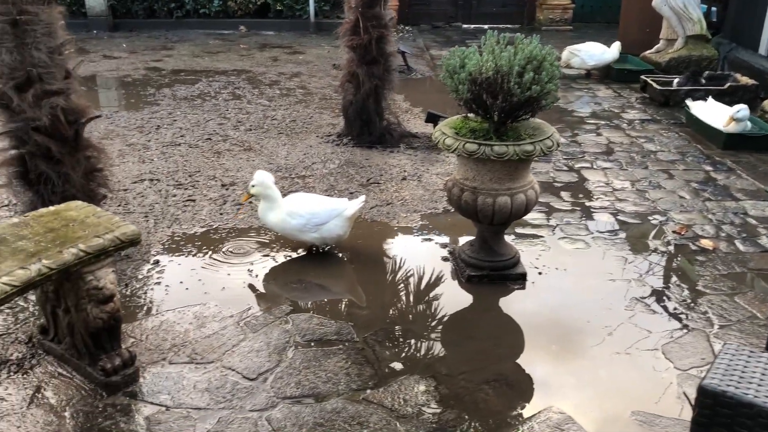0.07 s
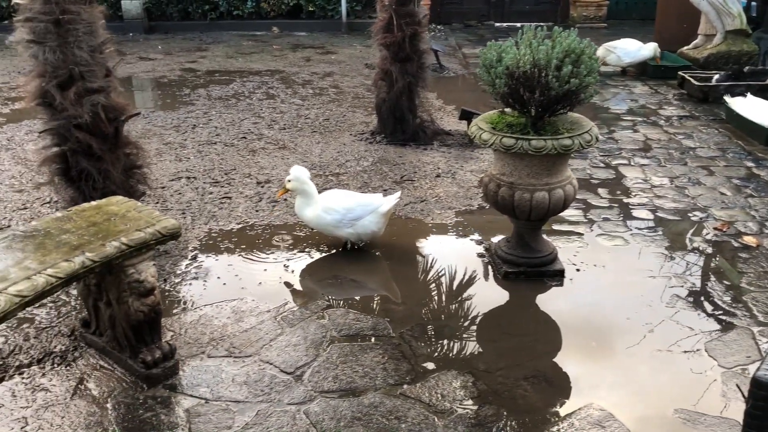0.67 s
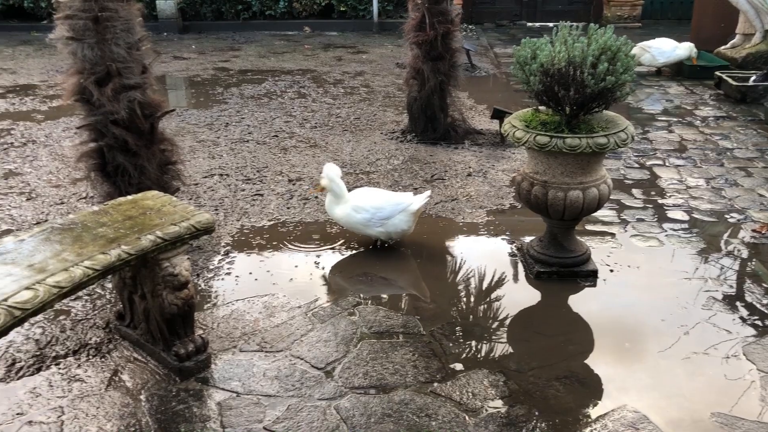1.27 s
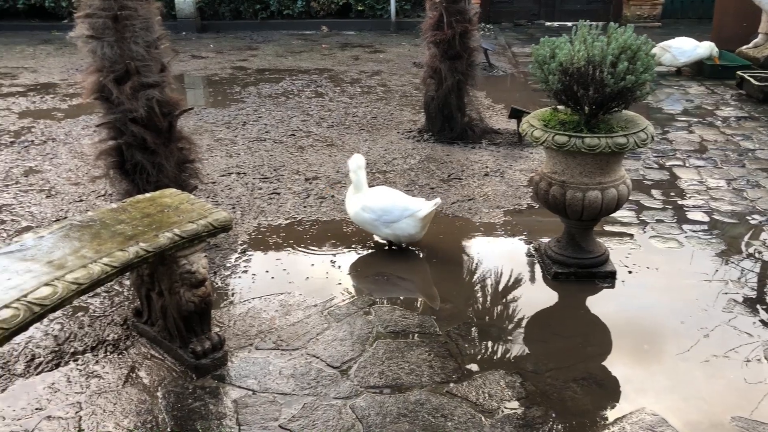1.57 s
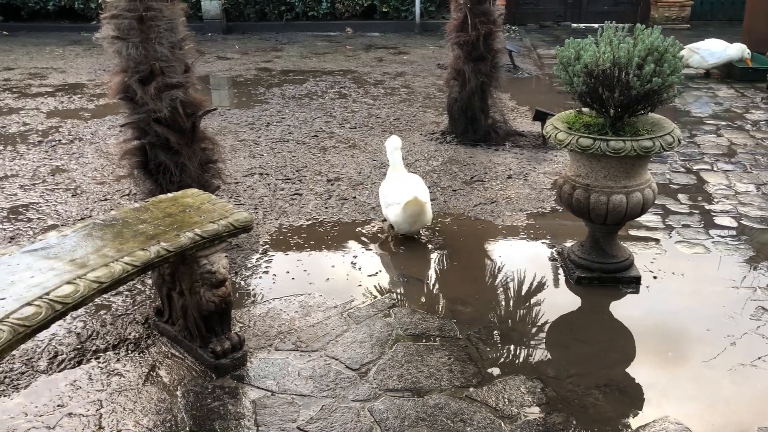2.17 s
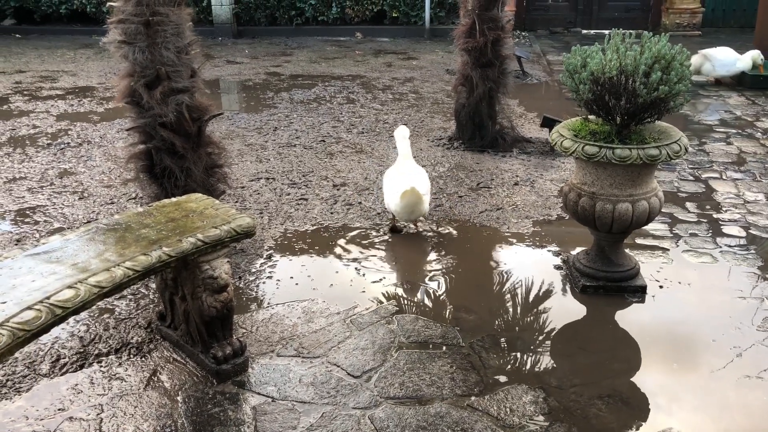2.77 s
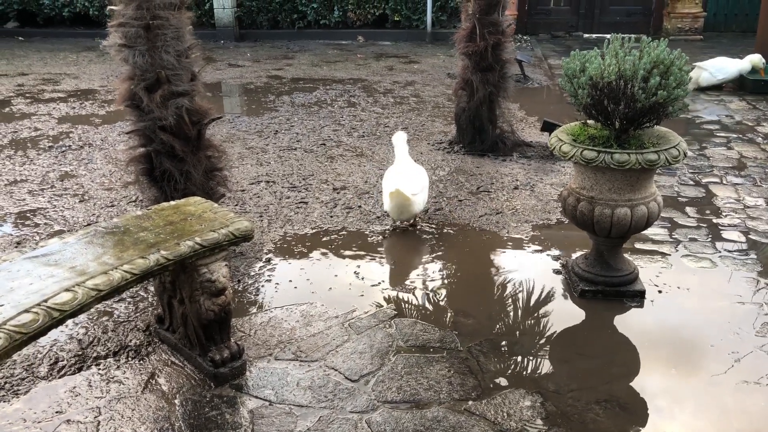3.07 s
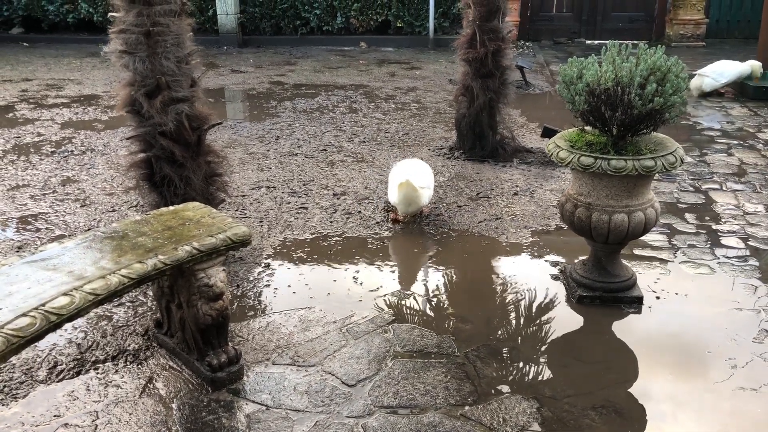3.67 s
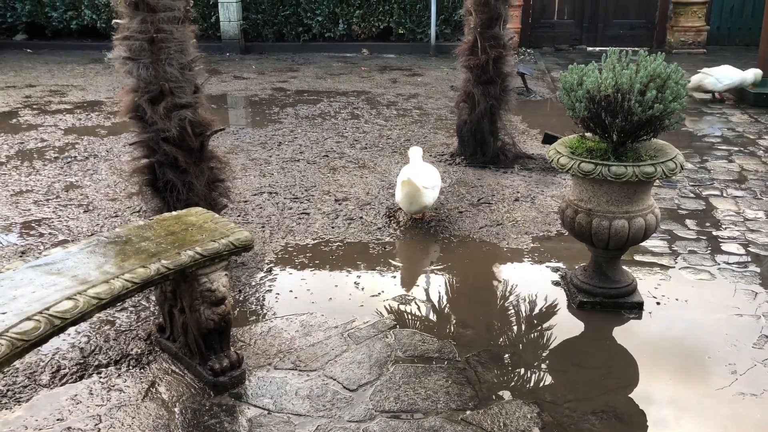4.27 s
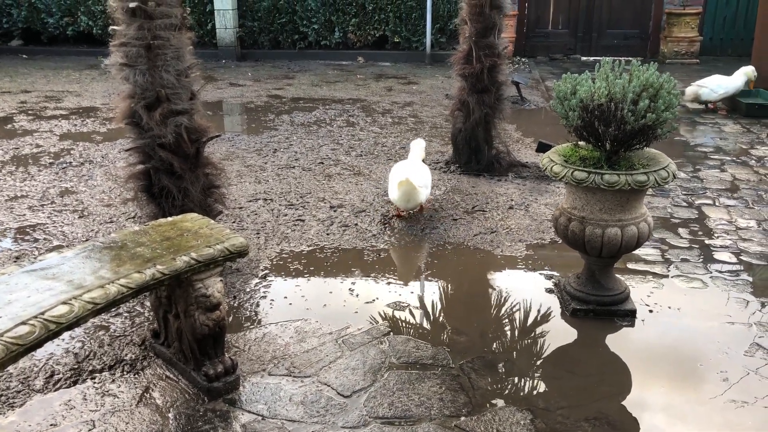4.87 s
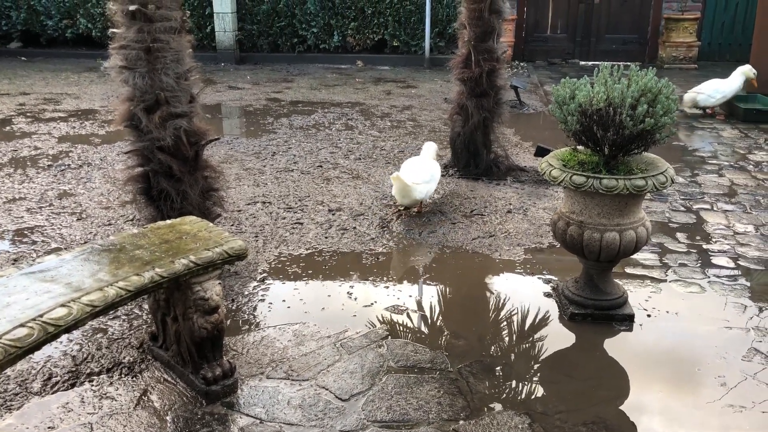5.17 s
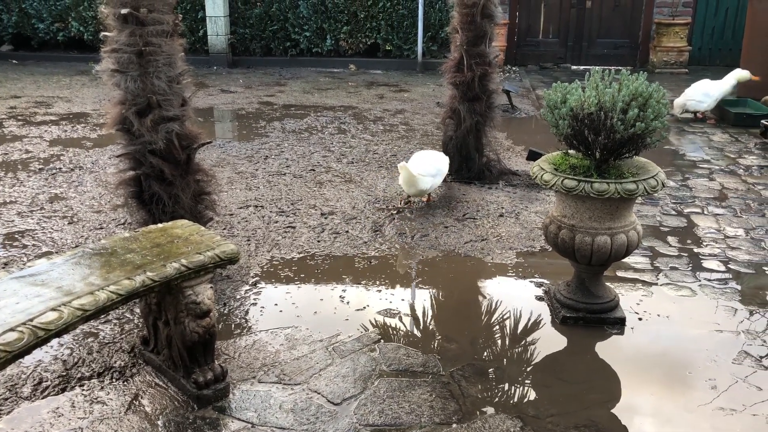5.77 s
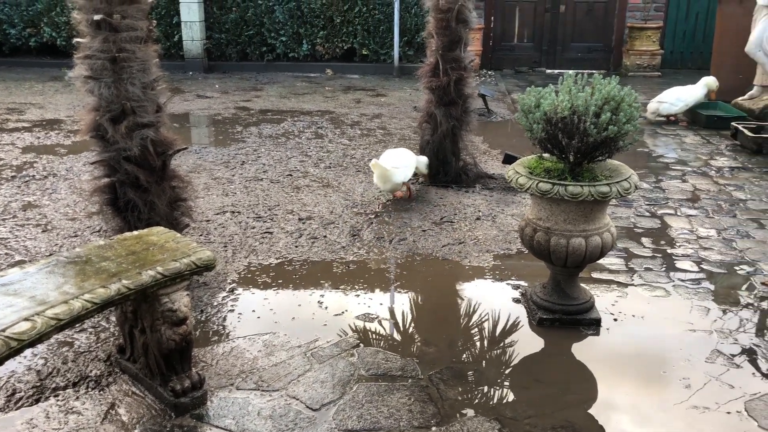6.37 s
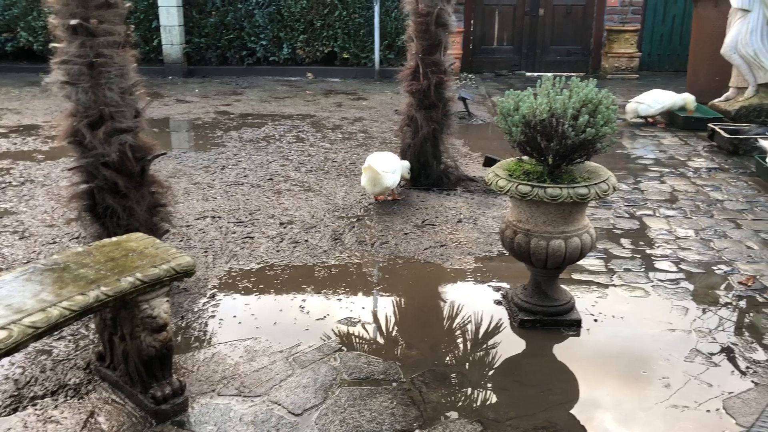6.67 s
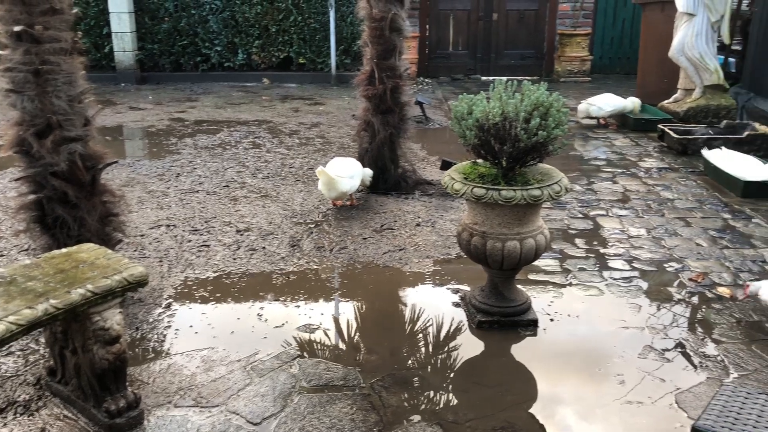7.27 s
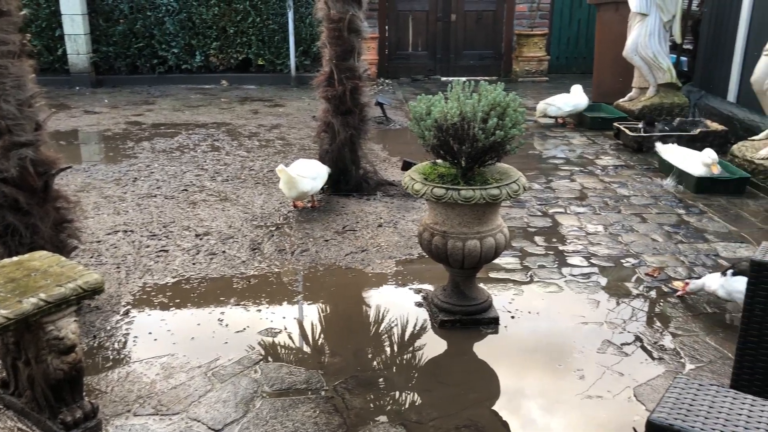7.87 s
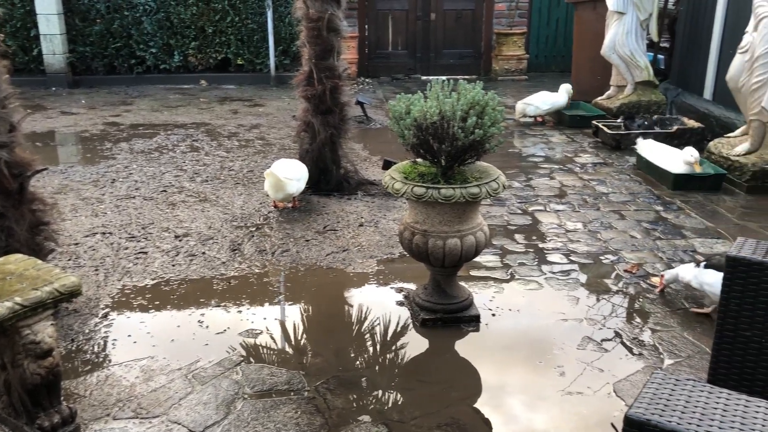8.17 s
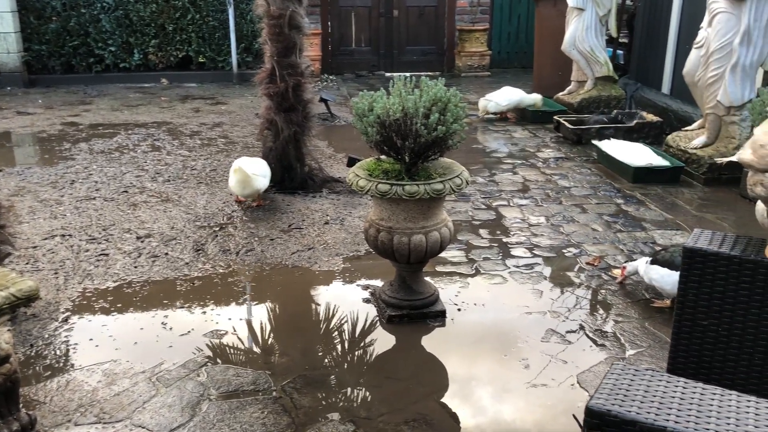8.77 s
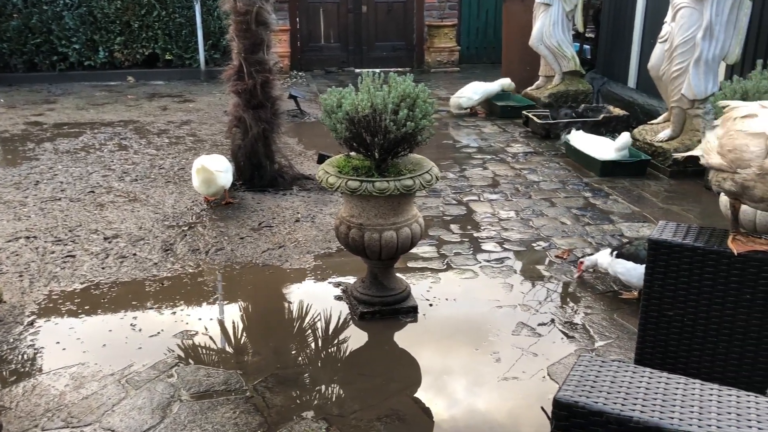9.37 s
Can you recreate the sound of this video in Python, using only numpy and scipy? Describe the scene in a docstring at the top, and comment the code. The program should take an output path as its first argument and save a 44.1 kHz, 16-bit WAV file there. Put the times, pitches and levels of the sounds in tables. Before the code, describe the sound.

Short squeaky whines and low clucks from a duck come and go throughout, some ending in a throaty rasp. A few wading steps splash through a puddle, followed by runs of quick, wet nibbling from dabbling bills and a light patter of drips. It is a quiet walled courtyard with a slight echo, a faint town hum and occasional soft wind on the microphone.

```python
"""A paved, walled courtyard where ducks dabble in rain puddles. Bills snap water films in quick, even bouts and
in louder lone snaps, and webbed feet swish, over a patter of drips and bubbles. A duck gives short reedy
squeaks and trilling whines that drop into a rasp of separate throat pulses. The walls add a brief echo; a
distant town hums and air buffets the microphone softly."""
import sys
import numpy as np
from scipy import signal
from scipy.fft import rfft, irfft
from scipy.io import wavfile
from scipy.ndimage import uniform_filter1d

SR = 44100
rng = np.random.default_rng(int(sys.argv[2]) if len(sys.argv) > 2 else 0)


def master_out(mix):
    """Clip the mix to full scale and print it as 16-bit PCM to the path in sys.argv[1]."""
    frames = np.transpose(np.atleast_2d(mix))
    ceiling = np.clip(frames, -1, 1)
    pcm = np.round(ceiling * 32767).astype(np.int16)
    wavfile.write(sys.argv[1], SR, pcm)


N = 415863
TIME = np.arange(N) / SR

# Each row: first snap in seconds, last snap in seconds, snap count, snap level in dB,
# snap centre in Hz, smack level in dB.
NIBBLE_BOUTS = [(3.969, 4.283, 6, -50, 7000, -49), (4.543, 4.988, 8, -46, 6540, -53),
                (5.317, 5.903, 10, -50, 5900, -63), (6.375, 6.994, 10, -41.5, 7510, -56.5),
                (7.191, 8.0803, 14, -44.5, 6180, -49.5), (8.589, 8.7634, 4, -47, 6500, -54),
                (8.85, 9.053, 4, -42.5, 4670, -46.5)]


def nibbles(uneven_db=2, tune_oct=0.201, hurry=0.024, smack_lag_s=.04, smack_hz=3940, loose_s=.003):
    """A bill snaps shut and reopens with a softer smack. Yields rows laid out like LONE_SNAPS."""
    for first, last, count, snap_db, snap_hz, smack_db in NIBBLE_BOUTS:
        for u in np.linspace(0, 1, round(count)):
            s = first + (last - first) * (u + hurry * u * (1 - u))
            size, tune, smack_size, smack_tune, late = rng.standard_normal(5)
            yield s, snap_db + uneven_db * size, snap_hz * 2 ** (tune_oct * tune), 0.61
            smack_s = s + smack_lag_s + loose_s * late
            yield smack_s, smack_db + uneven_db * smack_size, smack_hz * 2 ** (tune_oct * smack_tune), 0.43


# Further bill snaps and smacks, louder ones at lone times. Each row: start in seconds, level in dB, centre in
# Hz, spread in octaves.
LONE_SNAPS = [(0.186, -53, 4100, 0.26), (0.2274, -41.5, 5400, .25), (0.5464, -40, 4200, 0.89),
              (0.5527, -39.5, 7200, .6), (2.813, -56, 8000, .8), (2.8992, -44.5, 4440, 0.88),
              (3.0838, -41.5, 3195, 0.62), (3.159, -48.5, 4006, .5), (3.2142, -37, 5790, 0.44),
              (3.2182, -34.5, 7780, 0.75), (3.2448, -42, 3580, .6), (3.2904, -32.5, 5700, 0.61),
              (3.3227, -40.5, 7030, 0.46), (3.353, -48, 2590, .45), (3.385, -47, 4047, 0.68),
              (3.4314, -39, 5490, 0.27), (3.5632, -48, 4900, 0.31), (3.5863, -44, 3950, 0.56),
              (3.642, -47.5, 6500, 0.41), (3.6804, -43, 4785, 0.17), (3.87, -40, 2740, .85),
              (4.088, -40.5, 2580, 0.72), (4.2521, -38.5, 3120, 1.13), (4.6542, -40, 3650, 0.29),
              (4.717, -40, 3830, .3), (5.0601, -44.5, 2094, 1.5), (5.5824, -37, 5500, 0.33),
              (5.7162, -46.5, 2750, 0.63), (5.901, -40, 6340, 0.32), (6.088, -51, 2720, 0.29),
              (6.2101, -43, 4350, 0.22), (6.227, -49.5, 1800, 0.66), (6.2667, -38.5, 4170, 1.02),
              (6.3005, -41, 3780, 1.07), (6.3412, -45, 4450, .5), (6.3659, -36, 3333, .6),
              (6.5776, -39.5, 7700, 0.34), (6.7222, -39, 2930, 0.48), (6.7648, -43, 7200, .6),
              (6.7927, -39.5, 7290, 0.51), (6.8619, -40.5, 3500, 0.42), (7.0275, -43, 7600, 0.87),
              (7.1915, -40.5, 9960, 0.49), (7.261, -37, 3800, 0.24), (7.3309, -37, 6800, .4),
              (7.4691, -45.5, 3030, 0.79), (7.5791, -42.5, 3800, 0.84), (7.3702, -30.5, 4220, 0.8),
              (7.5175, -31.5, 5260, 0.54), (7.5936, -38.5, 10800, .45), (7.8732, -36, 6770, .5),
              (7.9114, -49, 2725, 0.59), (7.9177, -34.5, 2650, 0.45), (8.0564, -31, 4900, 0.56),
              (8.0797, -38.5, 5560, .45), (8.1353, -43.5, 7030, 0.72), (8.3934, -46.5, 5480, 0.77),
              (8.4476, -41, 4530, 0.89), (8.9809, -36.5, 7100, 0.46), (9.198, -35.5, 5410, 0.52),
              (9.2871, -43, 7800, 0.34)]


def bills(level_window_s=0.0054, touch_db=-17, touch_lead_s=0.002):
    """Wet clicks of bills, each preceded by a faint touch on the water."""
    out = np.zeros(N)
    for s, db, hz, spread_oct in [*LONE_SNAPS, *nibbles()]:
        add(out, s - touch_lead_s * rng.uniform(.5, 1.6), amp(db + touch_db) * click(hz, spread_oct))
        add(out, s, amp(db) * click(hz, spread_oct))
    return np.sqrt(level_window_s * SR) * out


def click(hz, spread_oct, spatter_db=-7, skirt_db=-34, bubbles_db=-8, lag_s=.0005, size=1024, count=3):
    """A water film snaps, with a fine spatter and a few tiny bubbles in its wake; energy 1."""
    f = np.fft.rfftfreq(size, 1 / SR) + 1
    t = np.arange(size) / SR
    hump = np.exp(-(np.log2(f / hz) / (2 * max(spread_oct, .15))) ** 2) + amp(skirt_db)
    tilt_db = log_interp([(100, -34), (500, 26), (1500, 15.5), (4000, 1), (9000, 2.5), (16000, 0)], f)
    snap = minimum_phase(hump * amp(tilt_db))
    spatter = rng.standard_normal(size) * np.exp(-t / .0018)
    spatter *= amp(spatter_db) / np.linalg.norm(spatter)
    spatter[0] = 1
    sound = signal.fftconvolve(snap, spatter)[:size]
    sound /= np.linalg.norm(sound)
    for tune, lag in zip(rng.uniform(-1.016, 1, count), rng.exponential(lag_s, count)):
        bubble_hz = min(hz * 2 ** (tune * spread_oct), 11000)
        add(sound, lag, amp(bubbles_db) * bubble(bubble_hz, ring_cycles=5.9))
    return sound / np.linalg.norm(sound)


def bubble(hz, ring_cycles, rise_per_cycle=0.0046, size=1024):
    """A bubble rings and rises in pitch as it nears the surface; energy 1."""
    cycles = hz * np.arange(size) / SR
    glide = 1 + rise_per_cycle * np.minimum(cycles, 40)
    phase = 2 * np.pi * np.cumsum(glide) * hz / SR
    ping = np.sin(phase) * np.exp(-cycles / ring_cycles) * (1 - np.exp(-cycles))
    return ping / np.linalg.norm(ping)


# One pitch curve per whine. Each row: time in seconds, pitch in Hz.
WHINE_CURVES = [
    [(0.327, 1877), (0.347, 1510), (0.357, 2472), (0.369, 2255), (0.378, 2603)],
    [(0.406, 1568), (0.412, 1118), (0.44, 1546), (0.46, 1560), (0.479, 813)],
    [(1.516, 1202), (1.524, 1116), (1.538, 1374), (1.548, 2153), (1.558, 1490), (1.568, 2418), (1.58, 1522),
     (1.588, 2093), (1.598, 1168), (1.608, 1599), (1.618, 1188), (1.645, 924)],
    [(4.792, 1550), (4.802, 1174), (4.82, 1754), (4.906, 1590), (4.924, 1321), (4.946, 2132), (4.958, 1183),
     (4.972, 1128), (4.986, 2220), (4.998, 990), (5.005, 812.5)],
    [(6.79, 1639), (6.806, 1090), (6.82, 1480), (6.918, 1388), (6.94, 2390), (7.024, 1883), (7.076, 1967),
     (7.09, 1541), (7.116, 1500), (7.143, 828)],
    [(7.935, 1397), (7.971, 1292), (7.977, 1440), (8.037, 1583), (8.057, 1449), (8.085, 2222),
     (8.117, 1540), (8.141, 2419), (8.169, 2046), (8.183, 1063), (8.2, 768)],
    [(9.085, 1394), (9.119, 1270), (9.163, 2190), (9.183, 2162), (9.197, 1437), (9.245, 1285),
     (9.267, 1596), (9.279, 1279), (9.304, 1042)],
]
# Each entry: level of one whine in dB, before thinning.
WHINE_LEVELS_DB = [-39.5, -39.5, -39.5, -42, -45.5, -45, -44.5]
# Each row: start in seconds, length in seconds, lowest pitch in Hz, level in dB.
DIPPING_SQUEAKS = [(1.219, .03, 2070, -61.5), (1.286, .047, 1620, -64), (1.445, .032, 1130, -43.5),
                   (2.433, .042, 950, -66), (2.583, .033, 950, -56), (2.891, .05, 1250, -40.5),
                   (3.707, .036, 1090, -36)]
# Each row: start in seconds, length in seconds, first pitch in Hz, level in dB.
FALLING_SQUEAKS = [(0.574, .012, 1567, -52), (1.331, .016, 1052, -58), (1.677, .024, 1386, -40),
                   (2.475, .011, 1108, -54.5), (2.55, .03, 1600, -61), (2.623, .023, 1109, -51),
                   (2.939, .051, 1610, -43.5), (3.052, .017, 1246, -39), (3.122, .029, 1097, -51),
                   (3.269, .047, 1402, -49.5), (3.467, .042, 1357, -52.5), (9.382, .013, 1100, -39)]


def notes(bend_s=0.005, thin_above_hz=1290, thin_db_per_oct=-10.5, dip_oct=.62, dip_at=.47, fall_oct=.85):
    """Whines that thin out up high, and short squeaks. Yields start in seconds, pitch in Hz, gain."""
    def arch(u):
        return unit_rms(1 - 0.18 * (2 * u - 1) ** 2)
    for rows, db in zip(WHINE_CURVES, WHINE_LEVELS_DB):
        s, hz = np.transpose(rows)
        hz = np.interp(np.arange(s[0], s[-1], 1 / SR), s, hz)
        hz = uniform_filter1d(hz, round(bend_s * SR))
        yield s[0], hz, amp(db + thin_db_per_oct * np.maximum(np.log2(hz / thin_above_hz), 0))
    for start, length, hz, db in DIPPING_SQUEAKS:
        u = np.linspace(0, 1, round(length * SR))
        yield start, hz * 2 ** (dip_oct * (2 * (u - dip_at)) ** 2), amp(db) * arch(u)
    for start, length, hz, db in FALLING_SQUEAKS:
        u = np.linspace(0, 1, round(length * SR))
        yield start, hz * 2 ** (-fall_oct * u), amp(db) * arch(u)


# Each row: harmonic number, level in dB relative to the fundamental.
VOICE_HARMONICS = [(2, -11), (3, -24)]


def squeaks(edge_s=.003, trill_hz=48, flutter_hz=420, hoarse_hz=1250, level_db=-1, hiss_db=-16, throb_db=4):
    """One reed-like tone trills through each note, louder in its dips and hissing more as it drops."""
    weight, pitch, level = np.full(N, 1e-9), np.full(N, 1e-6), np.zeros(N)
    for start, hz, gain in notes():
        add(weight, start, np.ones(len(hz)))
        add(pitch, start, hz)
        add(level, start, gain)
    window = signal.windows.hann(round(2 * edge_s * SR)) / (edge_s * SR)
    weight, pitch, level = (np.convolve(c, window, "same") for c in (weight, pitch, level))
    hz = pitch / weight
    rough = 1 / (1 + (hz / hoarse_hz) ** 4)
    # Each trill cycle sags, then flicks upward.
    trill = 1 - np.pi / 2 * abs(np.sin(drifting_phase(trill_hz, depth=.25, drift_hz=20) / 2))
    waver = .12 * (1 - rough) * trill
    jitter = 0.0214 * wander(hz=606)
    phase = 2 * np.pi * np.cumsum(hz * (1 + waver + jitter)) / SR
    flutter = np.cos(drifting_phase(flutter_hz, depth=0.33, drift_hz=80.74))
    tone = np.cos(phase)
    for harmonic, db in VOICE_HARMONICS:
        tone += amp(db) * np.cos(round(harmonic) * phase) * (1 + 0.3 * wander(hz=200))
    tone *= 1 + 0.37 * flutter + 0.32 * wander(hz=122)
    hiss = noise([(200, -1), (700, -4.5), (2000, 10), (5000, 4.5), (8000, -10), (16000, -60)])
    hiss *= amp(hiss_db) * (.5 + rough) * (1 + flutter)
    return amp(level_db - throb_db * trill) * level * (np.sqrt(2) * tone + hiss)


# Each row: start in seconds, end in seconds, pulses per second, level in dB, brightness in dB.
RASP_BURSTS = [(0.244, 0.264, 230, -51, 2), (0.479, 0.497, 266, -42.5, -0.5), (0.526, 0.527, 300, -55, 4),
               (0.589, 0.602, 255, -48, -1), (1.641, 1.664, 270, -43, 2), (1.679, 1.723, 216, -40, 4.5),
               (1.76, 1.786, 254, -44, 0.5), (2.909, 2.938, 254, -47.5, 11), (3.058, 3.077, 276, -45, 5),
               (3.092, 3.118, 178, -46.5, -1), (3.714, 3.74, 242, -62, 17), (3.786, 3.816, 162, -49.5, -11),
               (5.001, 5.027, 230, -42, -4.5), (7.141, 7.172, 223, -43.5, -0.5),
               (8.196, 8.223, 204, -43, -2), (9.303, 9.328, 238, -42.5, -2),
               (9.362, 9.364, 230, -51.5, -15), (9.391, 9.404, 178, -39, -19)]


def rasps(slowing=0.312, jitter=.06, level_db=2, spit_db=-13):
    """The squeak breaks into uneven pulses that slow down and darken, each with a spit of noise."""
    out = np.zeros(N)
    spit = noise([(300, -16), (1500, 4), (4000, 2.5), (6500, -16), (9000, -26), (16000, -46)])
    for start, end, rate, db, bright_db in RASP_BURSTS:
        length = end - start
        train = np.zeros(round(length * SR) + SR // 100)
        s = 0
        for gap, size, tune in rng.standard_normal((30, 3)):
            if s > length - .002:
                break
            progress = s / length
            top_hz = 2300 * np.exp(0.091 * tune - .5 * progress)
            flap = throat_flap(top_hz, low_hz=237, fall_s=.0012, ring_s=.00082, overtone_db=bright_db - 8.5)
            add(train, s, flap * amp(1.8 * size - 15 * (progress - .4) ** 2))
            s += (1 + slowing * (progress - .5)) * np.exp(jitter * gap) / rate
        train += amp(spit_db + bright_db) * abs(train) * np.roll(spit, -round(start * SR))[:len(train)]
        add(out, start, amp(db + level_db) * unit_rms(train) * np.sqrt(len(train) / (length * SR)))
    return out


# Each row: start in seconds, level in dB.
SOFT_CLUCKS = [(0.167, -47), (0.691, -52), (0.86, -41), (1.088, -43.5), (1.283, -41.5), (2.431, -36.5),
               (2.58, -38.5), (2.993, -35), (3.255, -33), (3.305, -33), (3.46, -41), (3.577, -43.5),
               (5.644, -44), (5.771, -42), (6.417, -40), (6.663, -42.5), (6.712, -41), (8.072, -41.5)]


def clucks(level_db=-5, puff_db=-14):
    """Single, slower throat flaps, each with a short hoarse puff."""
    out = np.zeros(N)
    puff = noise([(300, -29), (1000, 22), (2200, 5), (3500, -10), (6000, -24), (16000, -45)])
    for (s, db), tune in zip(SOFT_CLUCKS, rng.standard_normal(len(SOFT_CLUCKS))):
        top_hz = 1900 * np.exp(0.11 * tune)
        flap = throat_flap(top_hz, low_hz=245, fall_s=0.00288, ring_s=0.0021, overtone_db=-8.5)
        t = np.arange(len(flap)) / SR
        flap += amp(puff_db) * np.exp(-t / 0.035) * np.roll(puff, -round(s * SR))[:len(t)]
        add(out, s, amp(db + level_db) * flap)
    return out


def throat_flap(top_hz, low_hz, fall_s, ring_s, overtone_db):
    """One flap of the throat: a few cycles that drop steeply in pitch."""
    t = np.arange(SR // 40) / SR
    hz = low_hz + (top_hz - low_hz) * np.exp(-t / fall_s)
    phase = 2 * np.pi * np.cumsum(hz) / SR
    swell = t / ring_s * np.exp(1 - t / ring_s)
    return swell * (np.sin(phase) + amp(overtone_db) * swell * np.sin(2 * phase))


# Each row: centre in Hz, bandwidth in Hz, gain in dB.
THROAT_MODES = [(228, 33, 15.5), (479, 28, -3), (689, 66, 0), (770, 52, 0)]


def throat(x):
    """Adds the low ringing of the windpipe and air sacs."""
    return x + sum(amp(db) * signal.lfilter(*signal.iirpeak(hz, hz / width_hz, SR), x)
                   for hz, width_hz, db in THROAT_MODES)


# Each row: start in seconds, pitch in Hz, level in dB.
DRIP_BUBBLES = [(4.064, 1711, -43.5), (5.756, 2200, -50.5), (6.005, 1900, -51.5), (7.675, 3230, -48),
                (7.696, 2390, -46), (7.834, 454, -44), (8.647, 2370, -47), (8.65, 514, -55)]


def drips(level_window_s=0.0054):
    """Each drip traps one ringing bubble."""
    out = np.zeros(N)
    for s, hz, db in DRIP_BUBBLES:
        add(out, s, amp(db) * bubble(hz, ring_cycles=3.4))
    return np.sqrt(level_window_s * SR) * out


# Each row: time in seconds, level of the stirred water in dB.
WATER_ACTIVITY = [(0.0, -65), (1.44, -72.5), (1.6, -65), (2.84, -74.5), (3.02, -61.5), (4.96, -54.5),
                  (5.33, -61), (8.06, -53), (8.4, -58.5), (9.11, -52.5), (9.43, -60)]


def patter(nibble_hz=15, nibble_db=4, ticks_per_s=110, bubbles_per_s=420, spread_db=5, bands=32):
    """Small ticks and short-lived bubbles, bunched by the nibbling of the bill."""
    def impulses(per_s):
        hits = rng.random(N) < per_s / bands / SR
        return hits * amp(spread_db * np.minimum(rng.exponential(1, N), 3))
    ticks, bubbles = np.zeros(N), np.zeros(N)
    for u in np.linspace(0, 1, bands):
        ticks += signal.oaconvolve(impulses(ticks_per_s), click(2000 * 4.54 ** u, spread_oct=0.46))[:N]
        bubbles += signal.oaconvolve(impulses(bubbles_per_s), bubble(1150 * 10 ** u, ring_cycles=2.2))[:N]
    nibble = amp(nibble_db * np.sin(drifting_phase(nibble_hz, depth=0.1947, drift_hz=5.25)))
    mix = amp(-5) * unit_rms(ticks * nibble) + amp(-3) * unit_rms(bubbles * nibble)
    return amp(curve(WATER_ACTIVITY)) * mix


def gurgles(per_s=14, level_db=2, low_hz=750, range_oct=1.095, level_window_s=0.0099, bands=8):
    """The bill sucks larger pockets of water: soft, low slurps at random times."""
    out = np.zeros(N)
    for u in np.linspace(0, 1, bands):
        slurps = (rng.random(N) < per_s / bands / SR) * rng.uniform(0.48, 1, N)
        out += signal.oaconvolve(slurps, click(low_hz * 2 ** (range_oct * u), spread_oct=0.466))[:N]
    return amp(curve(WATER_ACTIVITY) + level_db) * np.sqrt(level_window_s * SR) * out


# Each row: start in seconds, decay in seconds, level in dB.
FOOT_SWISHES = [(.01, 0.086, -66), (0.18, 0.035, -55), (1.12, 0.047, -67), (1.98, 0.047, -55.5),
                (2.17, 0.042, -52.5), (2.261, 0.046, -53), (2.495, 0.023, -47), (2.761, 0.031, -50.5),
                (6.261, 0.0096, -35.5)]


def wading(rise_s=0.0019, grain_db=4):
    """A foot pushes a grainy sheet of water that soon settles."""
    level = np.zeros(N)
    t = np.arange(SR // 2) / SR
    for s, decay_s, db in FOOT_SWISHES:
        add(level, s, amp(db) * (1 - np.exp(-t / rise_s)) * np.exp(-t / decay_s))
    spray = noise([(200, 1), (700, 4.5), (2500, 4.5), (7000, -0.5), (11000, -3.5), (16000, -13)])
    return level * unit_rms(spray * amp(grain_db * wander(hz=298)))


# Each row: frequency in Hz, time to decay by 60 dB in seconds.
TAIL_T60 = [(150, 0.24), (700, 0.21), (2000, 0.17), (6000, 0.17), (15000, 0.17)]
# Each row: delay in seconds, relative level in dB.
WALL_ECHOES = [(.0031, -13), (.0074, -14), (.0128, -26.5), (.0215, -33), (.034, -27)]


def courtyard(x, echo_db, tail_db):
    """Direct sound, a few echoes from paving and walls, and a short diffuse tail."""
    hz, t, spectra = signal.stft(rng.standard_normal(SR // 2), SR, nperseg=256)
    decay = amp(-60 * t / log_interp(TAIL_T60, hz)[:, None])
    tail = signal.istft(spectra * decay, SR, nperseg=256)[1]
    response = amp(tail_db) * tail / np.linalg.norm(tail)
    response[0] += 1
    for delay_s, db in WALL_ECHOES:
        add(response, delay_s, amp(db + echo_db) * np.array([.2, .6, .2]))
    return signal.fftconvolve(x, response)[:N]


# Each row: centre in seconds, half length in seconds, level in dB.
AIR_LUMPS = [(1.03, .06, -48), (1.91, .06, -47), (2.09, .03, -52), (2.235, .025, -43), (2.32, .05, -45),
             (3.65, .08, -47), (6.33, .07, -48), (8.92, .06, -49)]
# Each row: frequency in Hz, relative level in dB.
LUMP_SPECTRUM = [(20, -32), (35, -2), (55, 2), (110, -0.5), (200, -8), (350, -23.5), (700, -38),
                 (2000, -77)]


def buffets(flutter_db=5):
    """Soft, low lumps of air hit the microphone."""
    lumps = sum(amp(db) * np.exp(-((TIME - s) / half_s) ** 2) for s, half_s, db in AIR_LUMPS)
    return lumps * noise(LUMP_SPECTRUM) * amp(flutter_db * wander(hz=12.6))


# Each row: frequency in Hz, relative level in dB.
TOWN_SPECTRUM = [(20, -28), (35, -6), (55, 4.5), (110, 5.5), (230, 1), (400, -9), (900, -13), (1600, -18),
                 (4000, -23), (8000, -26), (16000, -32)]


def town(level_db=-57):
    """Steady noise of a distant town."""
    return amp(level_db) * noise(TOWN_SPECTRUM)


def amp(db):
    """Decibels to gain."""
    return 10 ** (np.asarray(db) / 20)


def unit_rms(x):
    """Scales to rms 1."""
    return x / np.sqrt(np.mean(x ** 2) + 1e-20)


def log_interp(points, hz):
    """Interpolates (Hz, value) points on a log-frequency axis."""
    f, value = np.transpose(points)
    return np.interp(np.log(hz + 1), np.log(f), value)


def curve(rows):
    """Interpolates (seconds, value) rows at every sample."""
    return np.interp(TIME, *np.transpose(rows))


def add(mix, s, sound):
    """Mixes a sound in at s seconds."""
    part = mix[max(round(s * SR), 0):][:len(sound)]
    part += sound[:len(part)]


def noise(spectrum):
    """Noise of rms 1, shaped by (Hz, dB) points."""
    gain = amp(log_interp(spectrum, np.fft.rfftfreq(N, 1 / SR)))
    return unit_rms(irfft(rfft(rng.standard_normal(N)) * gain, N))


def wander(hz):
    """Random drift of rms 1, rolled off above hz."""
    gain = np.exp(-(np.fft.rfftfreq(N, 1 / SR) / hz) ** 2)
    return unit_rms(irfft(rfft(rng.standard_normal(N)) * gain, N))


def drifting_phase(hz, depth, drift_hz):
    """Phase in radians of a rate that wanders around hz."""
    return 2 * np.pi * np.cumsum(hz * (1 + depth * wander(drift_hz))) / SR


def minimum_phase(gain):
    """The sharpest impulse that has this gain per frequency bin."""
    cepstrum = irfft(np.log(np.maximum(gain, 1e-4)))
    half = len(cepstrum) // 2
    folded = np.r_[cepstrum[0], 2 * cepstrum[1:half], np.zeros(half)]
    return irfft(np.exp(rfft(folded)))


def scene():
    """Voice and water echo in one courtyard, over air and town noise; mono."""
    voice = courtyard(throat(squeaks() + rasps() + clucks()), echo_db=-6.5, tail_db=-7.5)
    puddles = bills() + drips() + patter() + gurgles() + wading()
    water = courtyard(puddles, echo_db=-4, tail_db=-9)
    return (voice + water + buffets() + town())[None]


def record(dry, cutoff_hz=16100):
    """The recorder's band limit."""
    lowpass = signal.firwin(401, cutoff_hz, window=("kaiser", 9), fs=SR)
    return signal.oaconvolve(dry, lowpass[None], "same")


dry = scene()
out = record(dry)
master_out(out)
```